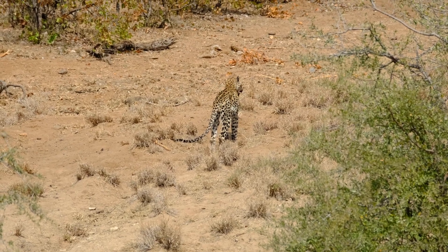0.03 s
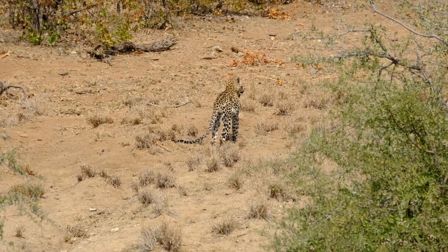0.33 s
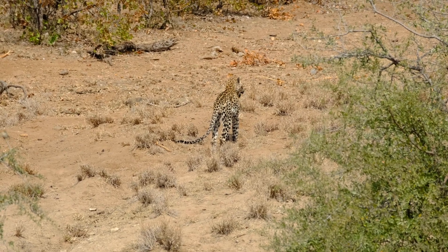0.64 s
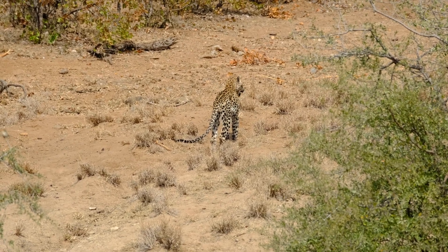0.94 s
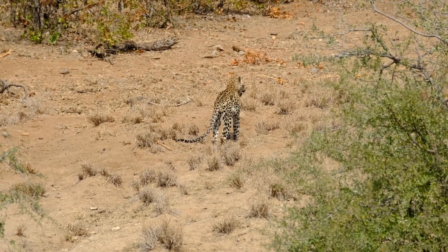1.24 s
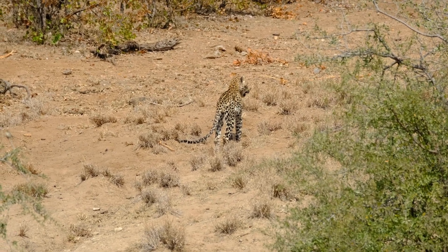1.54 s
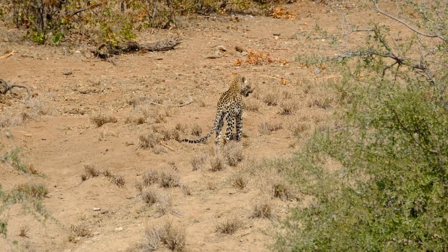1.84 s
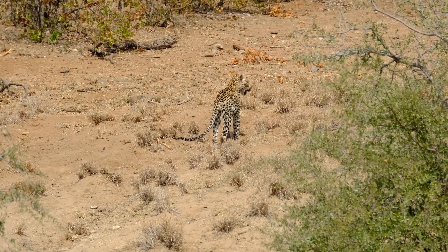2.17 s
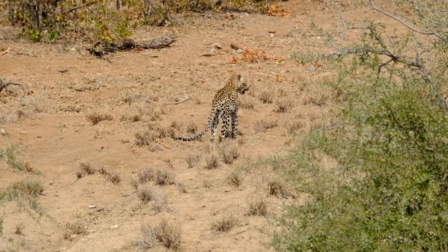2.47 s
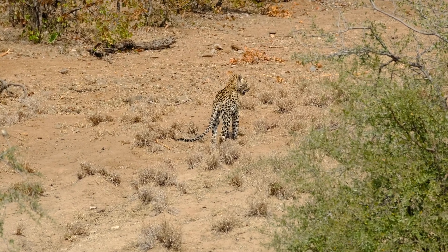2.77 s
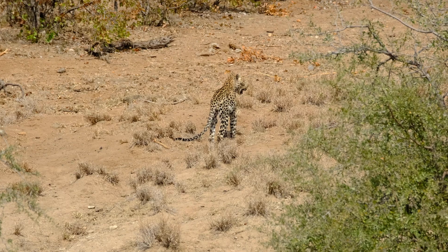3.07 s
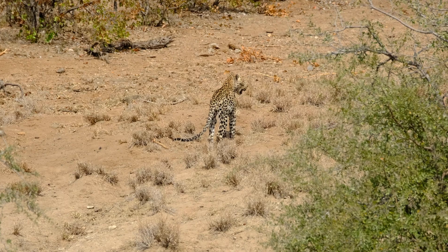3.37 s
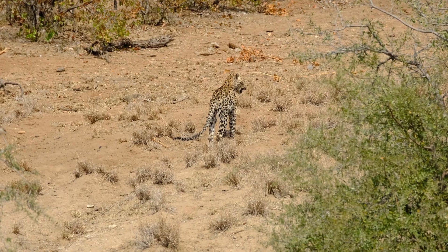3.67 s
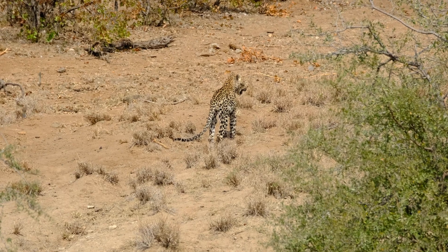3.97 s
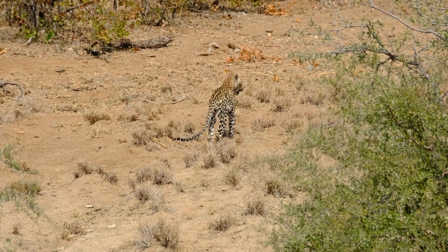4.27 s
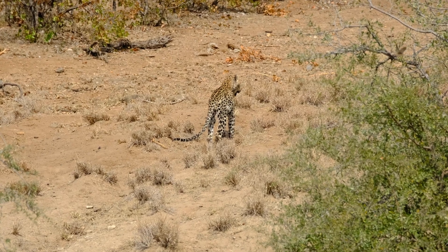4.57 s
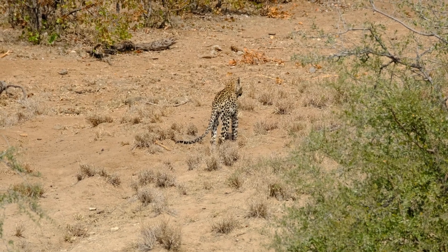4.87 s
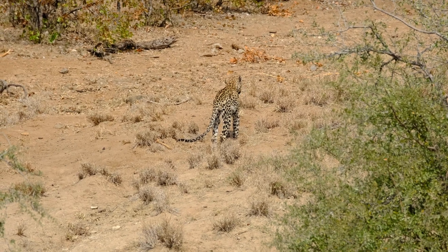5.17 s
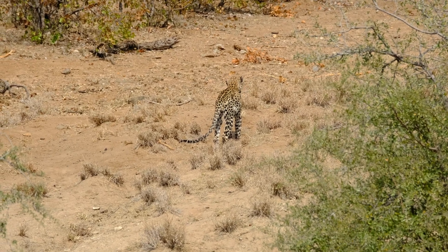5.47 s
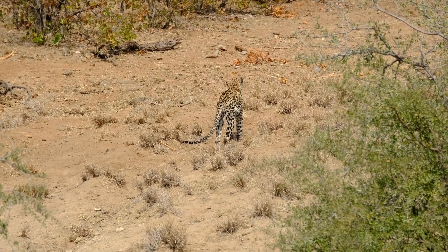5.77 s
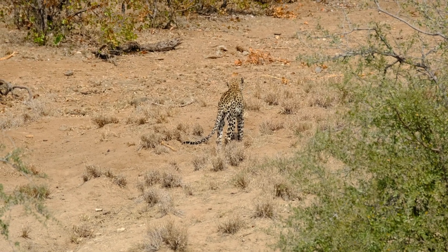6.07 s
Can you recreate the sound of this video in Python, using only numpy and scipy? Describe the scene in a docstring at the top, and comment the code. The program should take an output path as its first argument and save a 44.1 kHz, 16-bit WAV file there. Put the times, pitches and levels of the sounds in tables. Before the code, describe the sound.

Wind rumbles and thumps unevenly on a microphone in open, dry bushland, over a soft wash of breeze through scrub. Small birds give faint falling whistles and short slurred notes. About halfway through, a nearby still camera rattles off two quick shutter clicks as dry leaves stir. The gusts keep going and the birds change to thin, high chips. Most of it sits to the left, above a faint hiss.

```python
"""Gusts in dry bushland.

Wind buffets a microphone with rumble, eddies and thumps. The breeze washes through scrub and leaves,
small birds whistle and chip, and a nearby camera's mirror and blades rattle off two quick frames.
All this is on the left; mostly its lows reach the right. Under it lie faint hiss and a thin
electronic whine that stutters about once a second."""
import sys
import numpy as np
from scipy import signal
from scipy.fft import rfft, irfft
from scipy.io import wavfile
from scipy.ndimage import uniform_filter1d

SR = 44100
rng = np.random.default_rng(int(sys.argv[2]) if len(sys.argv) > 2 else 0)


def dump(signal):
    """Clip the signal to [-1, 1] and save it as 16-bit WAV at the path in sys.argv[1]."""
    limited = np.clip(np.atleast_2d(signal).T, -1, 1)
    pcm = np.round(limited * 32767).astype(np.int16)
    wavfile.write(sys.argv[1], SR, pcm)


N = 278271
TIME_S = np.arange(N) / SR


def amp(db):
    """Decibels to gain."""
    return 10 ** (np.asarray(db) / 20)


def unit(x):
    """Scales to rms 1."""
    return x / np.sqrt(np.mean(x ** 2) + 1e-20)


def curve_at(points, hz):
    """Interpolates (Hz, value) points on a log-frequency axis."""
    point_hz, values = np.transpose(points)
    return np.interp(np.log(hz + 1), np.log(point_hz + 1), values)


def envelope(rows):
    """Gain curve through (s, dB) points."""
    return amp(np.interp(TIME_S, *np.transpose(rows)))


def swells(rows):
    """Gain curve of bell-shaped swells."""
    return sum(amp(db) * np.exp(-((TIME_S - peak_s) / half_s) ** 2) for peak_s, half_s, db in rows)


def wander(count, size):
    """Smooth random drift of rms 1, changing about once in size samples."""
    return unit(uniform_filter1d(rng.standard_normal(max(count, SR)), size=size))[:count]


def add(mix, start_s, sound):
    """Mixes a sound in at start_s."""
    part = mix[round(start_s * SR):][:len(sound)]
    part += sound[:len(part)]


def noise(spectrum):
    """Steady coloured noise of rms 1."""
    colour = amp(curve_at(spectrum, np.fft.rfftfreq(N, 1 / SR)))
    return unit(irfft(rfft(rng.standard_normal(N)) * colour, N))


def patchy_noise(spectrum, patch_db):
    """Noise whose colour drifts in small patches of time and pitch."""
    hz, _, bins = signal.stft(rng.standard_normal(N), SR, nperseg=512)
    patches = uniform_filter1d(rng.standard_normal(bins.shape), size=9, axis=0)
    patches = unit(uniform_filter1d(patches, size=10, axis=1))
    colour = amp(curve_at(spectrum, hz)[:, None] + patch_db * patches)
    return unit(signal.istft(bins * colour, nperseg=512)[1][:N])


def steadied(x, size):
    """Levels out swells slower than about size samples."""
    power = uniform_filter1d(uniform_filter1d(x ** 2, size=size), size=size)
    return x / np.sqrt(abs(power) + 1e-9)


def scatter(x, t60_s):
    """Diffuse echoes from bushes and ground."""
    t = np.arange(SR // 2) / SR
    tail = rng.standard_normal(len(t)) * amp(-60 * t / t60_s) * (t > .004)
    return signal.fftconvolve(x, tail / np.linalg.norm(tail))[:N]


# Each row: frequency in Hz, relative density in dB.
HISS_SPECTRUM = [(100, -26), (1500, 4), (4000, 2.5), (9000, 1.5), (15500, 0.5)]

def hiss(level_db=-69):
    """Faint steady noise, independent in each channel."""
    return amp(level_db) * np.array([noise(HISS_SPECTRUM), noise(HISS_SPECTRUM)])


# Each row: start in seconds, length in seconds.
WHINE_BURSTS = [(.215, .15), (1.212, .14), (2.22, .15), (3.22, .165), (4.222, .17), (5.228, .025),
                (5.297, .15), (6.232, .15)]

def whine(tone_hz=15148, left_db=-66, right_db=-72, waver_rad=.6, on_chance=.68):
    """Bursts of electronic tone that cuts out at random and restarts at a new phase."""
    bursts = sum((TIME_S > start_s) & (TIME_S < start_s + length_s) for start_s, length_s in WHINE_BURSTS)
    slot = np.arange(N) // 220  # 5 ms each
    on = rng.random(slot[-1] + 1) < on_chance
    jumps_rad = np.cumsum(~on * rng.uniform(0, 2 * np.pi, len(on)))
    gate = uniform_filter1d(1. * bursts * on[slot], size=30)
    phase_rad = 2 * np.pi * tone_hz * TIME_S + jumps_rad[slot] + waver_rad * wander(N, size=120)
    return amp([[left_db], [right_db]]) * gate * np.sin(phase_rad)


# Each row: time in seconds, relative level in dB.
BREEZE_LEVELS = [(0, -69.5), (.6, -69.5), (1.6, -64.5), (3.6, -64.5), (5.05, -64.5), (6.31, -67)]
# Each row: frequency in Hz, relative density in dB.
SCRUB_SPECTRUM = [(100, -22), (220, 15), (400, 3.5), (700, 3.5), (1100, 2), (1600, -1.5), (2700, -4.5),
                  (3800, -3), (4500, -7.5), (5200, -12), (6600, -15), (9000, -18.5), (15000, -23)]

def scrub(gain_db=10):
    """The breeze washes through far bushes."""
    return amp(gain_db) * envelope(BREEZE_LEVELS) * patchy_noise(SCRUB_SPECTRUM, patch_db=1.22)


# Each row: peak time in seconds, half length in seconds, level in dB.
LEAF_STIRS = [(3.03, .25, -68), (3.6, 0.29, -63), (4.99, 0.11, -62.5)]
# Each row: frequency in Hz, relative density in dB.
LEAF_SPECTRUM = [(500, -24), (2000, 8.5), (4000, 8), (6000, -1), (10000, -0.5), (15000, -5)]

def leaves(rest_db=-85):
    """Dry leaves close by fizz as the breeze stirs them."""
    return (amp(rest_db) + swells(LEAF_STIRS)) * patchy_noise(LEAF_SPECTRUM, patch_db=1.0)


def bird_note(length_s, start_hz, end_hz, rough, late):
    """A flickering glide; rough adds scratchy pitch jitter, late delays the peak."""
    progress = np.linspace(0, 1, round(length_s * SR))
    jitter = 1 + .08 * rough * wander(len(progress), size=30)
    hz = start_hz * (end_hz / start_hz) ** progress * jitter
    swell = np.sin(np.pi * progress ** late) ** .7
    flicker = amp(2.6 * wander(len(progress), size=200))
    return swell * flicker * np.sin(2 * np.pi * np.cumsum(hz) / SR)


# Each row: start in seconds, length in seconds, start pitch in Hz, relative level in dB.
BIRD_WHISTLES = [(1.283, .022, 4600, -59), (1.878, .054, 6500, -59), (2.068, .035, 6100, -56.5),
                 (2.569, .055, 5900, -53.5), (3.019, .04, 5100, -52), (3.164, .044, 5900, -54),
                 (3.296, .054, 6200, -50), (3.715, .036, 5000, -53), (4.012, .036, 5900, -59.5)]
# Each row: start in seconds, length in seconds, start and end pitch in Hz, relative level in dB.
BIRD_SLURS = [(1.39, .06, 3900, 3400, -64), (1.672, 0.052, 4000, 3100, -64),
              (2.268, 0.044, 4030, 4440, -56), (2.485, 0.027, 3010, 3830, -55),
              (2.64, 0.085, 4130, 4300, -66), (4.31, .032, 3850, 3400, -56), (4.39, .05, 4400, 4280, -56.5),
              (4.428, 0.058, 4200, 3300, -59), (4.8, 0.042, 4300, 3830, -59)]
# Each row: start in seconds, start pitch in Hz, relative level in dB.
BIRD_CHIPS = [(4.73, 7240, -60), (4.762, 7000, -62), (4.795, 7300, -67), (4.997, 7200, -63),
              (5.188, 6950, -64), (5.25, 11000, -64), (5.44, 7340, -65), (5.495, 6900, -61),
              (5.725, 6900, -65), (5.9, 7200, -65), (6.012, 6860, -62), (6.187, 7170, -59)]

def birds(gain_db=-0.8, echo_db=-8, fall_octaves_per_s=17, chip_s=.036, chip_sag=.14):
    """One bird's falling whistles, softer slurs further off and high chips, scattered by the bushes."""
    notes = np.zeros(N)
    for start_s, length_s, start_hz, db in BIRD_WHISTLES:
        end_hz = start_hz / 2 ** (fall_octaves_per_s * length_s)
        add(notes, start_s, amp(db) * bird_note(length_s, start_hz, end_hz, rough=.1, late=1.54))
    for start_s, length_s, start_hz, end_hz, db in BIRD_SLURS:
        add(notes, start_s, amp(db) * bird_note(length_s, start_hz, end_hz, rough=.2, late=1.2))
    for start_s, start_hz, db in BIRD_CHIPS:
        end_hz = start_hz * (1 - chip_sag)
        add(notes, start_s, amp(db) * bird_note(chip_s, start_hz, end_hz, rough=.85, late=1.1))
    return amp(gain_db) * (notes + amp(echo_db) * scatter(notes, t60_s=.4))


# Each row: frequency in Hz, relative density in dB.
BLOW_SPECTRUM = [(300, -7), (750, 0), (1150, -12.5), (1600, 2.5), (2800, -1), (4500, -1.5), (5500, -12.5),
                 (7500, -19.5), (11000, -20), (15000, -30)]
# Each row: resonance in Hz, width in Hz, boost in dB.
CASE_MODES = [(1640, 100, -0.5), (2060, 70, -2), (2213, 120, 12), (2456, 48, 11), (4600, 180, 0.5),
              (8100, 160, 10)]
# Each row: opening time in seconds, time held open in seconds.
SHUTTER_FRAMES = [(3.462, .050), (3.568, .044)]
# Each row: offset from the opening or closing in seconds, level in dB, tilt in dB per octave.
OPENING_BLOWS = [(-.011, -41, 2), (-.005, -45, -8), (-.001, -36, -1)]
CLOSING_BLOWS = [(-.018, -39.5, -1.5), (-.010, -44, 3.5), (0, -37.5, .5), (.027, -51, -7)]  # the last is a bounce

def shutter(rise_s=.0014, blow_t60_s=.078, echo_db=-13):
    """Mirror and blades strike; each blow is a short chatter that rings in the camera's case."""
    t, hz = np.arange(8192) / SR, np.fft.rfftfreq(8192, 1 / SR)
    case_db = sum(db / (1 + (2 * (hz - mode_hz) / width_hz) ** 2) for mode_hz, width_hz, db in CASE_MODES)
    body_db = curve_at(BLOW_SPECTRUM, hz) + case_db
    octaves = np.log2(np.clip(hz, 1500, 12000) / 2500)
    strike = (1 - np.exp(-t / rise_s)) * amp(-60 * t / blow_t60_s)
    clicks = np.zeros(N)
    for open_s, held_s in SHUTTER_FRAMES:
        for at_s, blows in (open_s, OPENING_BLOWS), (open_s + held_s, CLOSING_BLOWS):
            for offset_s, db, tilt in blows:
                chatter = irfft(rfft(rng.standard_normal(len(t))) * amp(body_db + tilt * octaves))
                add(clicks, at_s + offset_s, amp(db) * strike * steadied(chatter, size=200))
    return clicks + amp(echo_db) * scatter(clicks, t60_s=.26)


def lumps(depth_db):
    """Gain of turbulence that comes and goes about ten times a second."""
    return amp(depth_db * wander(N, size=3000))


# Wind between buffets. Each row: time in seconds, strength in dB.
WIND_LEVELS = [(0, -41), (.8, -44), (1.0, -54.5), (1.08, -53.5), (1.15, -40.5), (1.38, -42.5),
               (1.59, -39.5), (2.08, -44), (2.14, -38), (2.54, -39.5), (2.62, -35), (3.74, -35),
               (3.89, -36.5), (4.27, -33.5), (4.75, -36.5), (5.05, -36), (5.76, -36), (6.31, -42)]
# Each row: peak time in seconds, half length in seconds, relative flare and push in dB.
WIND_BUFFETS = [(1.49, 0.036, -43.5, -51), (1.631, .04, -36, -40), (1.775, 0.049, -41.5, -39),
                (2.212, 0.038, -42, -40.5), (2.386, 0.038, -39, -34), (2.705, 0.023, -37.5, -30.5),
                (2.755, 0.023, -37, -62), (3.515, 0.072, -48, -38.5), (3.745, 0.019, -58, -37),
                (4.378, 0.031, -40.5, -34), (4.501, 0.061, -41, -34), (4.975, .08, -38, -36.5),
                (5.152, 0.03, -44, -31), (5.305, 0.055, -52, -38), (5.452, 0.049, -38, -39.5),
                (6.21, 0.053, -48.5, -43)]
# Four wind layers. Each row: frequency in Hz, relative density in dB.
RUMBLE_SPECTRUM = [(10, -21), (22, -18), (35, -2), (55, 2.5), (95, 0.5), (135, -7), (200, -27.5),
                   (400, -42), (1000, -87)]
THUMP_SPECTRUM = [(8, -15), (18, 9), (32, -16), (50, 2), (75, -27), (200, -54), (1000, -110)]
EDDY_SPECTRUM = [(40, -43), (100, -3.5), (160, 2.5), (220, -1.5), (290, -6), (380, -13.5), (500, -19.5),
                 (700, -30), (1000, -40), (2000, -56), (8000, -95)]
RASP_SPECTRUM = [(200, -6), (450, 1.5), (750, -6.5), (1200, -14), (2500, -24.5), (9000, -46)]

def wind(reference_db=-38, rumble_db=-40, push_gain_db=-.5, thump_gain_db=1, eddy_db=-43, rasp_db=-64):
    """Wind on the microphone drives rumble, eddies and rasp; buffets thump and flare the turbulence."""
    peak_s, half_s, flare_db, push_db = np.transpose(WIND_BUFFETS)
    flare = swells(zip(peak_s, half_s, flare_db))
    push = swells(zip(peak_s, half_s, push_db))
    strength = envelope(WIND_LEVELS) / amp(reference_db)
    turbulence = strength + flare / amp(reference_db)
    # Exponents: dB gained per dB of wind.
    pressure = amp(rumble_db) * strength ** .99 * lumps(depth_db=2.0) + amp(push_gain_db) * push
    rumble = pressure * steadied(noise(RUMBLE_SPECTRUM), size=3000)
    thump = amp(thump_gain_db) * push * steadied(noise(THUMP_SPECTRUM), size=2500)
    eddies = amp(eddy_db) * turbulence ** 1.214 * steadied(noise(EDDY_SPECTRUM), size=2200)
    rasp = amp(rasp_db) * turbulence ** 1.96 * noise(RASP_SPECTRUM)
    return rumble + thump + lumps(depth_db=1.42) * (eddies + rasp)


# Each row: frequency in Hz, gain in dB.
CROSSFEED_GAIN = [(140, 0), (210, -1), (330, -2.6), (500, -5), (770, -9.5), (1170, -15.5), (1800, -20),
                  (2400, -26), (4000, -43), (15000, -40)]
# Each row: frequency in Hz, phase lead in radians.
CROSSFEED_LEAD = [(130, 0), (300, 0.13), (690, 0.35), (1290, 1.4), (2150, 3.1)]

def crossfeed(left):
    """The right channel gets mostly the bass of the left, advanced in phase."""
    hz = np.fft.rfftfreq(N, 1 / SR)
    response = amp(curve_at(CROSSFEED_GAIN, hz)) * np.exp(1j * curve_at(CROSSFEED_LEAD, hz))
    return irfft(rfft(left) * response, N)


def scene():
    """Outdoor sources on the left, their lows on the right; hiss and whine in both."""
    left = wind() + scrub() + leaves() + birds() + shutter()
    return np.array([left, crossfeed(left)]) + hiss() + whine()


def record(dry, cutoff_hz=15790):
    """Steep low-pass band limit."""
    lowpass = signal.firwin(1023, cutoff_hz, window=("kaiser", 9), fs=SR)
    return signal.oaconvolve(dry, lowpass[None], "same")


dry = scene()
out = record(dry)
dump(out)
```